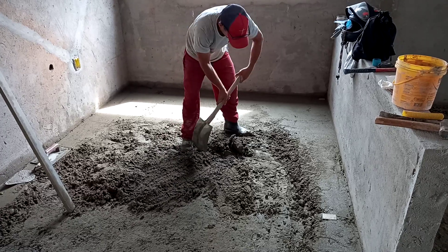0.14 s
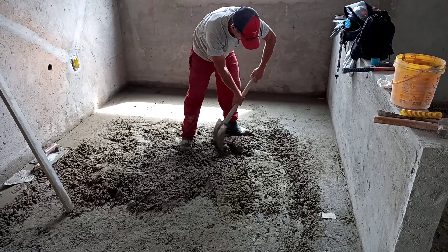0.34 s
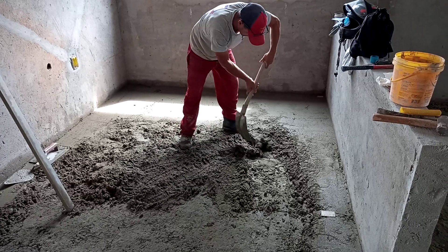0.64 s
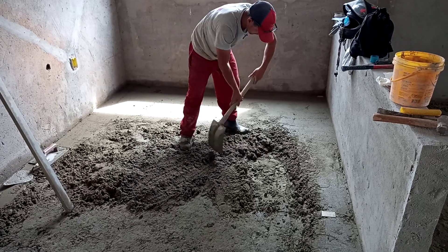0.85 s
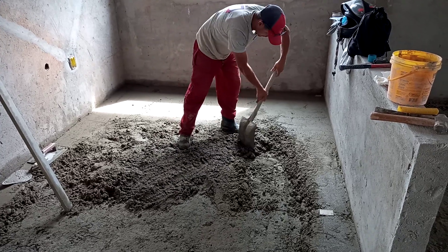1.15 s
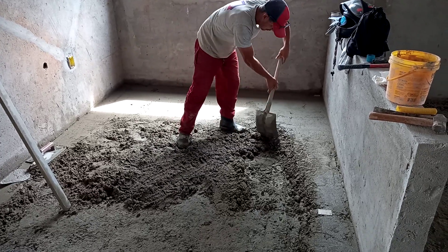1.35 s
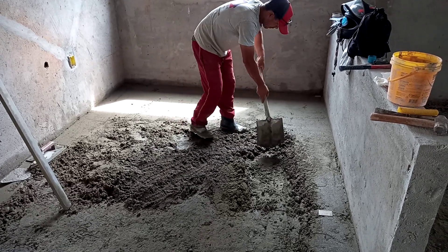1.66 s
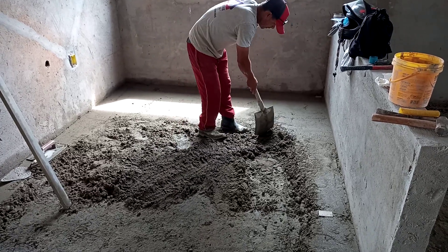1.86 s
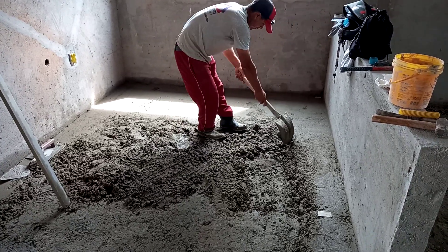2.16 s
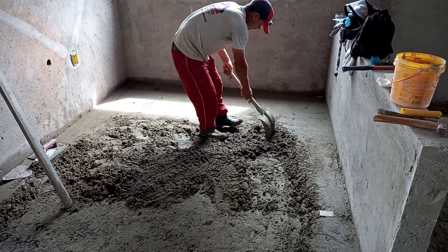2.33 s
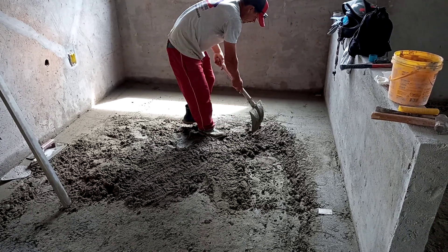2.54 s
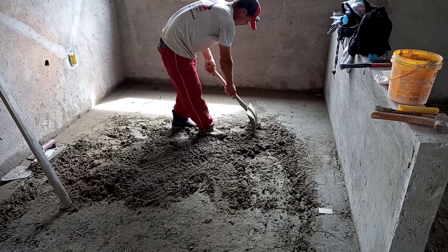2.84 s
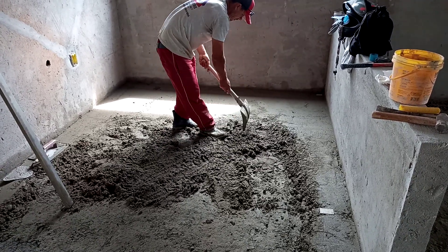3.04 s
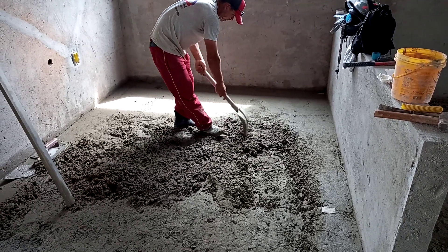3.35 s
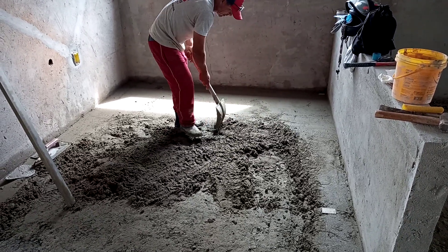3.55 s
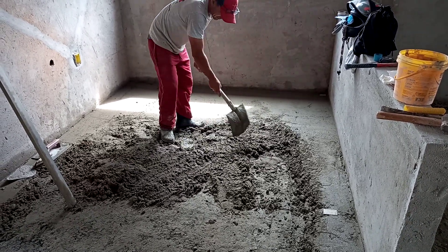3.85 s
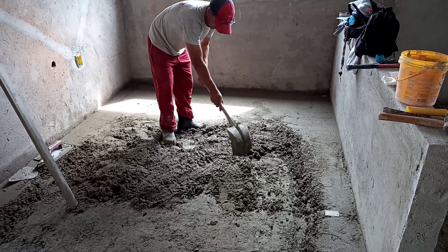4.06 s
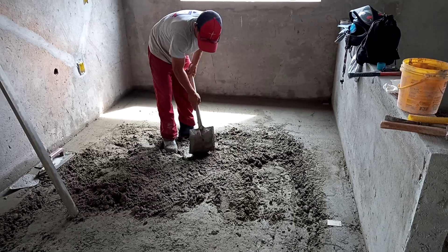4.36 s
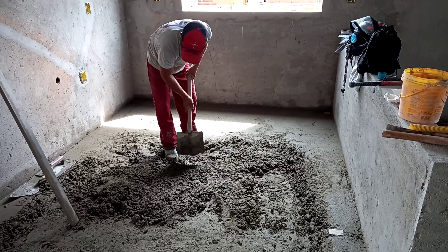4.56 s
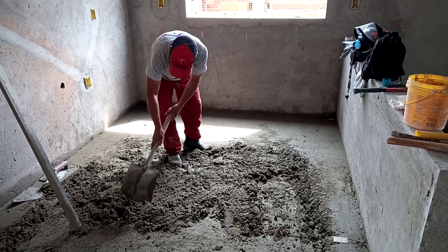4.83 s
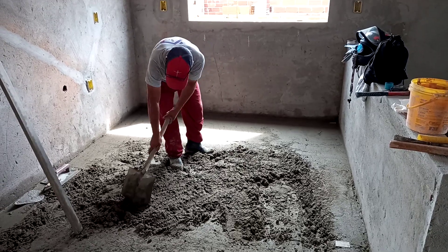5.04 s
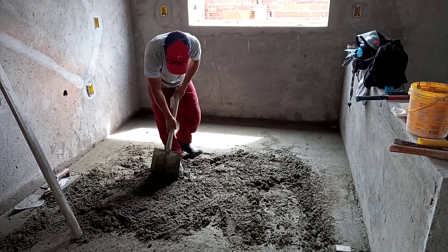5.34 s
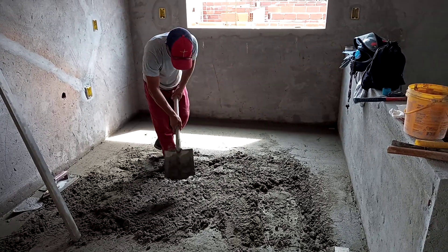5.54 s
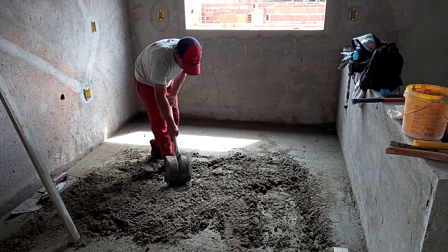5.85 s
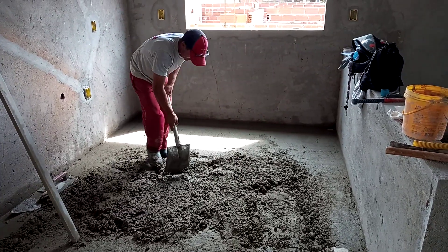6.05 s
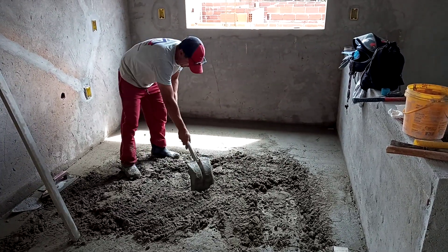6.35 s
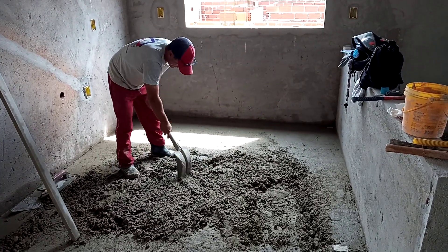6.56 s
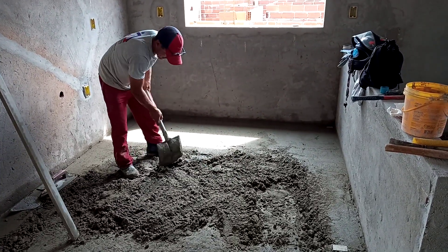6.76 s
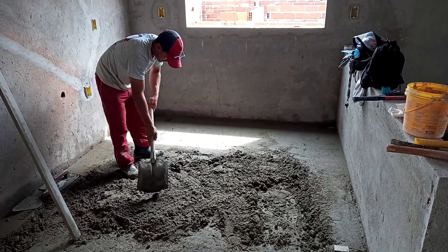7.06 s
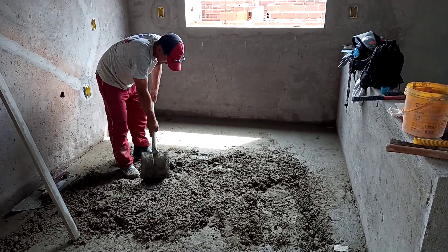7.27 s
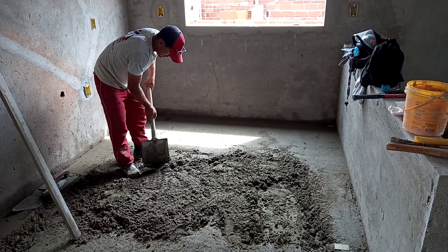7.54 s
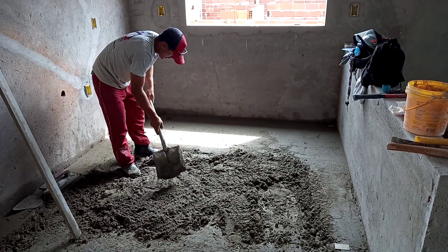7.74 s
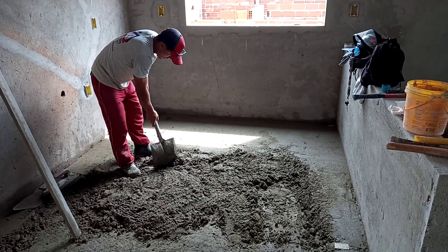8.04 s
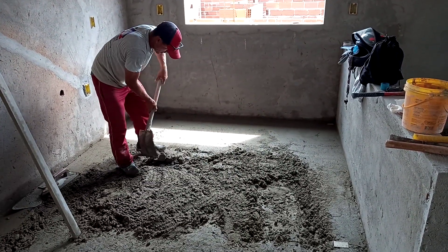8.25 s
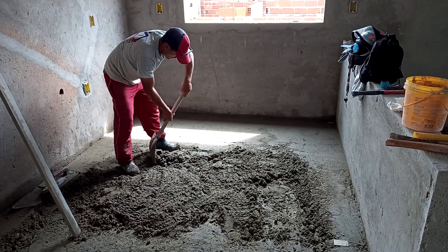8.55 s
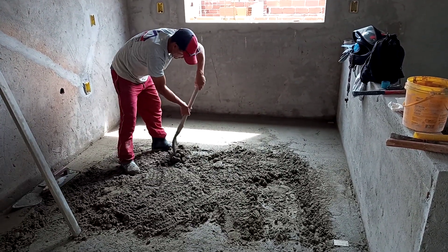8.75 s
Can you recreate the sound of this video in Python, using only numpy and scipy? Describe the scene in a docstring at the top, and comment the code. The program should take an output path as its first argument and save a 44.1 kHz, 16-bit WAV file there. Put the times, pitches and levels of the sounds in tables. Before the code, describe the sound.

Gritty shovel strokes spread wet mortar over concrete, with sharp metallic clinks ringing in a bare room.

```python
"""In a bare plastered room, a steel shovel spreads damp mortar over a concrete slab.
The blade bites into the heap and drags through wet sand: friction, heard as many tiny impacts.
Between strokes mortar slides off, the handle squeaks by stick-slip in its socket, and the steel
knocks home with a clank that excites the blade's modes. Stones tick, boots and clods thud,
and the walls reverberate with every blow over a soft rush of air."""
import sys
import numpy as np
from scipy import signal
from scipy.fft import rfft, irfft, next_fast_len
from scipy.io import wavfile
from scipy.ndimage import map_coordinates

SR = 44100
rng = np.random.default_rng(int(sys.argv[2]) if len(sys.argv) > 2 else 0)


def unload_wav(signal):
    """Save mono or channel-first audio to the path in sys.argv[1] as 16-bit WAV at rate SR, clipped to [-1, 1]."""
    wavfile.write(
        sys.argv[1],
        SR,
        np.round(np.clip(np.atleast_2d(signal).T, -1, 1) * 32767).astype(np.int16),
    )


N = 392490


def amp(db):
    """Decibels to amplitude ratio."""
    return 10 ** (np.asarray(db) / 20)


def unit(x):
    """Normalisation to rms 1."""
    return x / np.sqrt(np.mean(x ** 2) + 1e-20)


def unit_onset(x):
    """Normalisation to rms 1 over the first 80 ms."""
    return x / np.sqrt(np.mean(x[:int(0.08 * SR)] ** 2))


def along(points, hz):
    """Interpolation of (frequency_hz, value) points on a log frequency axis."""
    knots_hz, values = np.transpose(points)
    return np.interp(np.log(hz + 1), np.log(knots_hz + 1), values)


def filtered(x, response):
    """Linear filtering: the spectrum times a frequency response."""
    size = next_fast_len(len(x) + 8192)
    return irfft(rfft(x, size) * response(np.fft.rfftfreq(size, 1 / SR)), size)[:len(x)]


def band(x, lo_hz, hi_hz):
    """Causal band-pass filtering."""
    sections = signal.butter(3, [lo_hz, min(hi_hz, SR / 2 - 1)], 'band', fs=SR, output='sos')
    return signal.sosfilt(sections, x)


def resonate(x, modes):
    """Modal superposition: damped resonators (centre_hz, width_hz, gain_db) of alternating sign."""
    return filtered(x, lambda f: sum(
        (-1) ** k * amp(db) * 1j * f * width / (hz * hz - f * f + 1j * f * width)
        for k, (hz, width, db) in enumerate(modes)))


def wobble(rate, count=N):
    """Smooth random modulation, with rate knots a second."""
    return map_coordinates(rng.standard_normal(int(count * rate / SR) + 4), [np.arange(count) * rate / SR])


def grit(rate, spread_db, count=N):
    """Shot noise: about rate impacts a second, of uneven size, at rms 1."""
    impacts = rng.random(count) < rate / SR
    return unit(impacts * rng.standard_normal(count) * amp(spread_db * rng.standard_normal(count)))


def uneven(x, edges_hz, depth_db, rate):
    """Independent modulation of bands: grains of each size come and go at their own moments."""
    return unit(sum(band(x, lo, hi) * (-1) ** k * amp(depth_db * wobble(rate))
                    for k, (lo, hi) in enumerate(zip(edges_hz, edges_hz[1:]))))


def add(track, start_s, sound):
    """Superposition of a sound onto the track."""
    start = max(round(start_s * SR), 0)
    track[start:start + len(sound)] += sound[:N - start]


# Reverberation time of the room: frequency_hz, t60_s
WALL_DECAY = [(150, 0.63), (500, 0.79), (1500, 0.53), (3500, 0.39), (7000, 0.33), (15000, 0.26)]
def walls(build_s=0.0058):
    """Diffuse reverberation: a fresh impulse response of energy 1, each band decaying exponentially."""
    hz, t, spectrum = signal.stft(rng.standard_normal(int(SR * 0.8)), SR, nperseg=256)
    decay = amp(-60 * t / along(WALL_DECAY, hz)[:, None])
    tail = signal.istft(spectrum * decay * (1 - np.exp(-t / build_s)), SR, nperseg=256)[1]
    return tail / np.linalg.norm(tail)


def room(x, wet_db):
    """Convolution: the direct sound plus the reverberant field."""
    return x + amp(wet_db) * signal.fftconvolve(x, walls())[:len(x)]


# Spectrum of the quiet room: frequency_hz, relative_density_db
AIR_SPECTRUM = [(18, -69), (30, -33), (252, -21.5), (355, -8), (554, -11.5), (760, -16), (1160, -1.5),
                (1350, -1), (1590, -3), (1810, -6), (2410, -1), (2750, -7), (2980, -6.5), (3310, -6.5),
                (16000, -31.5)]
def air():
    """Ambient noise: a soft rush and two noise-driven room modes over a faint wavering rumble."""
    rush = unit(filtered(rng.standard_normal(N), lambda hz: amp(along(AIR_SPECTRUM, hz))))
    room_modes = [(160, 14.5, -13), (352.6, 16.4, -6)]
    boom = unit(resonate(band(rng.standard_normal(N), 150, 406), room_modes))
    rumble = amp(-90.5 + 3.6 * wobble(6)) * unit(band(rng.standard_normal(N), 68, 132))
    return amp(-48.5 + 2 * wobble(7.8)) * rush + amp(-69.5 + 4.8 * wobble(11)) * boom + rumble


# Landings of boots and clods: start_s, relative_level_db, pitch_hz
THUDS = [(0.625, -47.5, 241), (0.74, -57, 160), (0.956, -57, 257), (1.46, -53, 240), (1.93, -45, 260),
         (3.07, -60, 138), (5.69, -54.5, 267), (7.076, -58, 165), (8.269, -67, 124), (8.444, -62, 156)]
def thuds(rise_s=0.011, t60_s=0.14, width_hz=60):
    """Soft impact: boots and clods give the wet bed one low push each, and the room booms."""
    out, t = np.zeros(N), np.arange(int(SR * 0.7)) / SR
    for start_s, level_db, pitch_hz in THUDS:
        envelope = (1 - np.exp(-t / rise_s)) * amp(-60 * t / t60_s)
        push = room(envelope * rng.standard_normal(len(t)), wet_db=1.5)
        slap = unit(band(resonate(push, [(pitch_hz, width_hz, 0)]), pitch_hz * 0.34, pitch_hz * 1.74))
        weight = unit(band(push, 50, 115))
        add(out, start_s, amp(level_db - 16) * slap + amp(level_db - 46.5) * weight)
    return out


# Broad resonances of the blade: centre_hz, width_hz, gain_db
BLADE_MODES = [(351, 72, 0.5), (830, 310, 3), (984, 112, 8.5), (1463, 390, -2.5), (1490, 324, 8),
               (2202, 34, 12.5), (2970, 610, 4.5), (3110, 170, 11.5), (3760, 350, -2.5), (3810, 840, 1.5),
               (4310, 120, -1.5), (5250, 730, 2), (5650, 620, 1.5), (7520, 230, -2.5), (9440, 2100, -15),
               (14300, 1200, -12)]
def blade(force):
    """Forced vibration: the steel plate answers a force through its modes."""
    return resonate(force, BLADE_MODES)


# Hollow resonances of the loaded blade: centre_hz, width_hz, gain_db
SCOOP_MODES = [(359, 39, -10), (787, 89, 2)]
def scoop(force):
    """Resonance: the loaded blade gives a force a low, hollow colour."""
    return resonate(force, SCOOP_MODES)


# Stones striking the blade: start_s, relative_level_db
TICKS = [(0.948, -25.5), (1.91, -32), (2.755, -26.5), (4.903, -31.5), (5.697, -27.5), (7.079, -24),
         (7.833, -26), (8.184, -31.5)]
def ticks(t60_s=0.077):
    """Impulse excitation: small stones flick the blade's modes."""
    out, t = np.zeros(N), np.arange(SR // 2) / SR
    for start_s, level_db in TICKS:
        tick = blade(amp(-60 * t / t60_s) * grit(4300, 1.6, len(t)))
        add(out, start_s, amp(level_db - 25.5) * unit(room(tick, wet_db=-2.5)))
    return out


# Squeaks of the handle: start_s, relative_level_db, pitch_hz, overtone_db, length_s
SQUEAKS = [(0.147, -31.5, 2930, -17, 0.018), (0.905, -36.5, 2990, -14, 0.032),
           (0.928, -30.5, 2968, -15, 0.037), (1.672, -40, 2952, -30, 0.017),
           (1.687, -33.5, 2974, -25, 0.019), (2.12, -32.5, 2995, -30, 0.027),
           (3.258, -37, 2970, -14, 0.031), (4.012, -52, 3020, -28, 0.02), (5.413, -37, 3060, -27, 0.019),
           (6.062, -40, 3000, -27, 0.016), (6.32, -41, 3033, -26, 0.032), (7.055, -40, 3085, -28, 0.022),
           (7.809, -39.7, 2960, -17, 0.022), (7.83, -31, 2974, -19, 0.045)]
def squeaks(waver=0.0078, rolloff_db=4, rasp_db=-16, rasp_width_hz=500):
    """Stick-slip friction: wood in the steel socket gives a thin harmonic tone and a rasp of slips."""
    out, t = np.zeros(N), np.arange(SR // 2) / SR
    for start_s, level_db, pitch_hz, overtone_db, length_s in SQUEAKS:
        phase = 2 * np.pi * np.cumsum(pitch_hz * (1 + waver * wobble(505, len(t)))) / SR
        overtones = sum(amp(overtone_db - rolloff_db * (k - 2)) * np.sin(k * phase) for k in range(2, 6))
        slips = resonate(grit(2500, 1, len(t)), [(pitch_hz, rasp_width_hz, 0)])
        tone = np.sin(phase) + amp(rasp_db) * unit(band(slips, 1870, 4500))
        arch = np.sin(np.pi * np.clip(t / length_s, 0, 1))
        grip = arch * amp(level_db + 4.5 + 1.2 * wobble(200, len(t)))
        add(out, start_s, room(grip * tone, wet_db=-5) + room(grip * overtones, wet_db=-9))
    return out


# Spectrum of wet sand under steel: frequency_hz, relative_density_db
SAND_SPECTRUM = [(59, -62), (100, -40), (160, -21), (206, -44), (266, -19), (691, -6.5), (784, -0.5),
                 (1360, -5.5), (2220, -0.5), (2800, -4), (4200, -1), (7450, -8.5), (12900, -20),
                 (15000, -14), (16000, -28.5)]
def sand(rate, spread_db, count=N):
    """Granular noise: random cracks of grains, shaped by the spectrum of wet sand."""
    return filtered(grit(rate, spread_db, count), lambda hz: amp(along(SAND_SPECTRUM, hz)))


# Loose mortar sliding off the blade: start_s, relative_level_db, length_s
SPILLS = [(0.073, -46, 0.26), (0.72, -50, 0.11), (1.5, -46.5, 0.12), (2.03, -53.5, 0.47), (2.67, -52, 0.22),
          (3.608, -50.5, 0.26), (5.58, -43, 0.11), (6.22, -51, .1), (6.335, -44.5, 0.077),
          (6.744, -55, 0.1), (6.972, -47, 0.3), (7.68, -55.5, .14), (8.15, -53, 0.18), (8.39, -44.5, 0.13)]
def spills(t, fade_db=7, load_db=-3):
    """Granular flow: each spill's level falls as the lightly loaded blade empties."""
    return [(start_s, length_s, load_db, level_db - fade_db * np.clip(t / length_s, 0, 1))
            for start_s, level_db, length_s in SPILLS]


# Strokes of the shovel, each a bite and a drag, at relative levels:
# start_s, bite_db, swell_s, drag_db, push_delay_s, length_s, load_db
STROKES = [(0.276, -23.5, 0.028, -40, .22, 0.49, 0.5), (0.995, -27.5, 0.037, -41, 0.15, 0.52, -1.5),
           (1.743, -24.5, 0.047, -38.5, 0.098, 0.15, 1), (2.273, -28, 0.011, -41.5, 0.17, .25, -6),
           (2.818, -21, 0.018, -44, 0.041, 0.6, -1), (3.32, -30, 0.03, -39.5, 0.19, 0.26, -7.5),
           (4.23, -19.5, 0.02, -35.5, .16, 0.31, 2.5), (4.983, -30, 0.019, -34, 0.3, 0.48, -1.5),
           (5.806, -19, 0.0088, -36.5, .13, 0.26, -2.5), (6.44, -27, 0.016, -31, 0.21, .27, -0.5),
           (7.154, -23, 0.03, -35, 0.25, 0.43, 0), (7.892, -25.5, 0.017, -31, .15, 0.19, 1.5),
           (8.497, -28, 0.015, -42, 0.38, 1, 3.5)]
def bites(t60_s=0.25, bright_hz=5500, scoop_db=-14):
    """Transient excitation: the edge cuts wet sand with a bright crunch that wakes the blade's hollow."""
    out, t = np.zeros(N), np.arange(SR // 2) / SR
    for start_s, bite_db, swell_s, *_, load_db in STROKES:
        crunch = unit(filtered(sand(9000, 1, len(t)), lambda hz: 1 + hz / bright_hz))
        crunch += amp(scoop_db + load_db) * unit(scoop(grit(2500, 1, len(t))))
        rise = 1 - np.exp(-(t / max(swell_s, 0.001)) ** 2)
        decay = amp(-60 * np.clip(t - swell_s, 0, 1) / t60_s)
        add(out, start_s, room(amp(bite_db - 7.5) * rise * decay * crunch, wet_db=-6.5))
    return out


def drags(t, lean_db=8, ease_db=9.5):
    """Friction noise follows force: each drag's level builds to the hardest push, then eases."""
    return [(start_s, length_s, load_db,
             drag_db + np.interp(t, [0, push_s, max(push_s, length_s)], [-lean_db, 0, -ease_db]))
            for start_s, _, _, drag_db, push_s, length_s, load_db in STROKES]


def sliding(attack_s=0.029, release_s=0.1, body_db=-27.5, body_growth=0.64, unload_db_per_s=17):
    """Amplitude envelopes of sliding sand and of pushed mortar, whose load shrinks as it is spread."""
    slide, pushed, t = np.zeros(N), np.zeros(N), np.arange(SR) / SR
    for start_s, length_s, load_db, level_db in drags(t) + spills(t):
        gate = np.clip(t / attack_s, 0, 1) * np.exp(-np.clip(t - length_s, 0, 1) / release_s)
        add(slide, start_s, gate * amp(level_db))
        add(pushed, start_s, gate * amp(body_db + body_growth * level_db + load_db - unload_db_per_s * t))
    return slide, pushed


def scraping(judder_db=1.2, grind_db=-4, hiss_db=-6.5, scoop_db=-1):
    """Sliding friction: sand grinds between steel and slab, fine grains hiss, lumps of mortar rumble."""
    slide, pushed = sliding()
    judder = amp(judder_db * wobble(45))  # the blade catches and slides
    grind = uneven(sand(5000, 1.2), [1050, 2400, 7000], depth_db=1.5, rate=15)
    grind += amp(-13.5) * unit(blade(grit(700, 2.5)))  # coarse grains tap the blade
    hiss = unit(band(sand(7000, 0.56), 7380, SR / 2))
    friction = slide * judder * (amp(grind_db) * grind + amp(hiss_db) * hiss)
    lumps = uneven(grit(900, 3), [270, 450, 686, 1160], depth_db=2, rate=16)
    lumps += amp(scoop_db) * unit(scoop(grit(900, 1.9)))
    return room(friction, wet_db=-6.5) + room(pushed * unit(lumps), wet_db=-3.5)


def chatter(t, wet_db, rate=2500, rise_s=0.00091, seat_s=0.011, t60_s=0.042):
    """Repeated impact: contacts rattle until the steel is seated, then die into the reverberation."""
    envelope = (1 - np.exp(-t / rise_s)) * amp(-60 * np.clip(t - seat_s, 0, 1) / t60_s)
    force = envelope * grit(rate, 1, len(t))
    force[int(0.003 * SR)] += np.linalg.norm(force) * 0.22  # the first hard contact
    return force / np.linalg.norm(force) + amp(wet_db) * walls()[:len(t)]


def mode_group(x, centre_hz, width_hz):
    """Resonators in cascade: two alike pick out one region of the spectrum."""
    mode = [(centre_hz, width_hz, 0)]
    return unit_onset(resonate(resonate(x, mode), mode))


# Narrow resonances of the steel: centre_hz, width_hz, gain_db
STEEL_TONES = [(1564, 27, -2), (1650, 30, -2), (2875, 28, -6), (2965, 50, -5.5), (3263, 32, -4),
               (3526, 32, -9), (4220, 220, 2)]
def singing(force):
    """Light damping: narrow modes ring on, added to the force that drives them."""
    return force + sum(resonate(force, [tone]) for tone in STEEL_TONES)


# Blows of the steel knocking home, at relative levels: start_s, ring_db, ring_hz, extra_width_hz,
# hollow_db, hollow_hz, glint_db, glint_hz, crack_db, room_db
CLANKS = [(0.002, -33, 3070, 1100, -34.5, 1950, -45, 7330, -49.5, 6),
          (0.647, -30, 3520, 1200, -32, 1570, -58, 4380, -50, -2.5),
          (1.447, -34, 3510, 890, -39.5, 1800, -44.5, 7670, -54, 1),
          (1.939, -32, 3230, 1410, -34, 1390, -37, 4700, -50, -5.5),
          (2.170, -38.5, 2890, 300, -43, 2470, -42, 4780, -47, 1),
          (2.266, -32, 5100, 900, -36.5, 2050, -43, 5750, -45.5, -1),
          (2.561, -26, 3580, 865, -30.5, 1490, -42.5, 7600, -49, 0),
          (3.029, -22, 3440, 236, -34, 1790, -33, 5040, -46.5, 0),
          (3.631, -38.5, 3190, 540, -52, 1650, -52, 7510, -58, -3.5),
          (4.506, -23, 3520, 324, -35, 1720, -37.5, 7270, -44, 1),
          (5.448, -24.5, 3450, 230, -31.5, 1600, -36.5, 7050, -43, 1.5),
          (6.088, -23, 3440, 202, -33.5, 1600, -38, 7000, -44, 2),
          (6.808, -25, 3070, 400, -34, 1650, -32.5, 5900, -43.5, 5),
          (7.579, -28, 3920, 560, -28.5, 1640, -54, 4900, -49.5, -3),
          (8.346, -39.5, 3110, 200, -49, 1780, -40.5, 5120, -63, -5)]
def clanks(ring_width_hz=200, hollow_width_hz=660, glint_width_hz=700):
    """Modal excitation: where a blow lands decides which groups of the blade's resonances stand out."""
    out, t = np.zeros(N), np.arange(int(SR * 0.7)) / SR
    for (start_s, ring_db, ring_hz, extra_width_hz,
         hollow_db, hollow_hz, glint_db, glint_hz, crack_db, room_db) in CLANKS:
        force = chatter(t, wet_db=room_db)
        tones, steel = singing(force), blade(force)
        ring = mode_group(tones, ring_hz, ring_width_hz + extra_width_hz)
        ring += amp(-10) * unit_onset(band(steel, 2270, 7130))
        ring += amp(-22) * unit_onset(scoop(force))
        hollow = mode_group(tones, hollow_hz, hollow_width_hz)
        hollow += amp(-6.5) * unit_onset(band(steel, 900, 2800))
        hollow += amp(-9.5) * unit_onset(band(steel, 306, 1066))  # low knock
        hollow += amp(-50) * unit_onset(band(force, 57, 140))  # the slab shudders
        glint = amp(-3) * mode_group(force, glint_hz, glint_width_hz)
        crack = amp(2) * unit_onset(band(steel, 8400, SR / 2))
        crack += amp(-12) * mode_group(force, 14200, 900)
        crack += amp(-3) * unit_onset(band(force, 5700, 16700))
        add(out, start_s, amp([ring_db, hollow_db, glint_db, crack_db]) @ [ring, hollow, glint, crack])
    return out


def scene():
    """Superposition: the shovel's sounds, the thuds and the room's air sum in one channel."""
    return (clanks() + ticks() + bites() + squeaks() + scraping() + thuds() + air())[None]


def record(dry, cutoff_hz=16050):
    """Band limiting: an ideal low-pass removes the highest treble."""
    return np.array([filtered(channel, lambda hz: hz < cutoff_hz) for channel in dry])


dry = scene()
out = record(dry)
unload_wav(out)
```